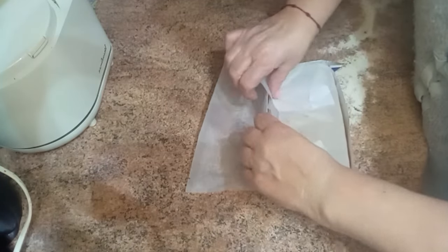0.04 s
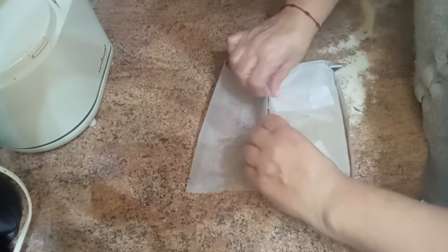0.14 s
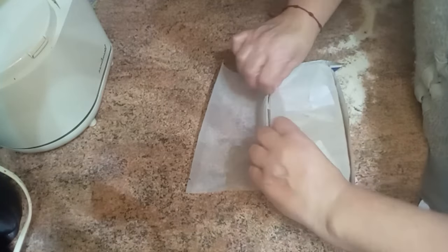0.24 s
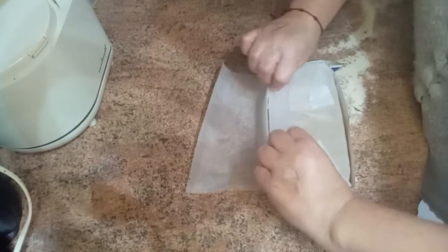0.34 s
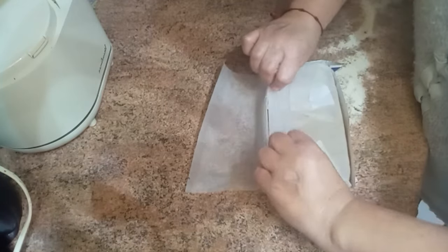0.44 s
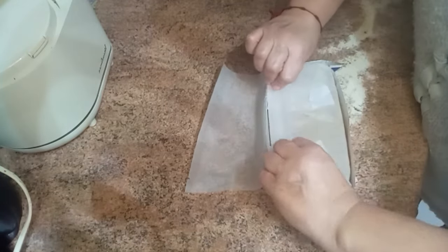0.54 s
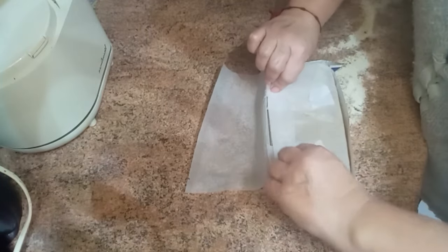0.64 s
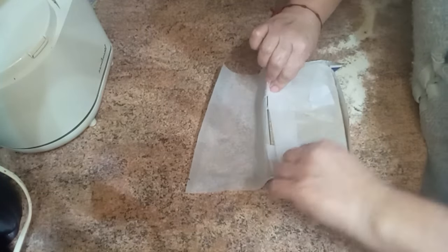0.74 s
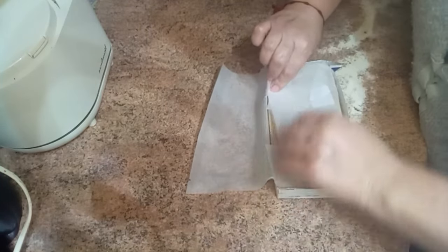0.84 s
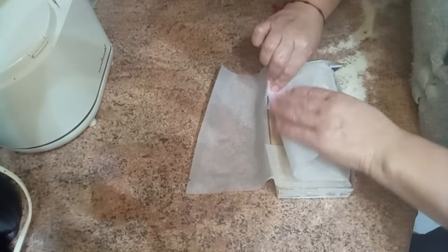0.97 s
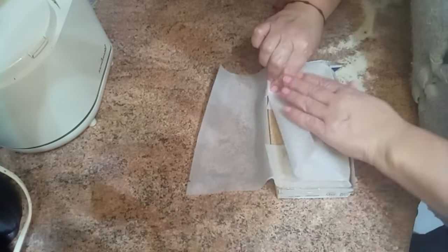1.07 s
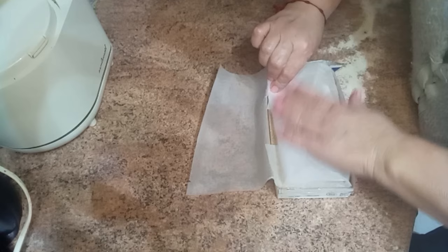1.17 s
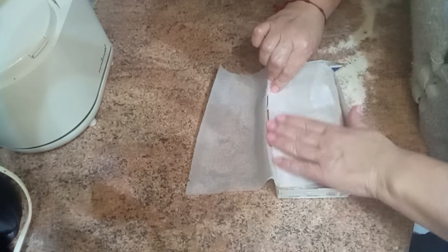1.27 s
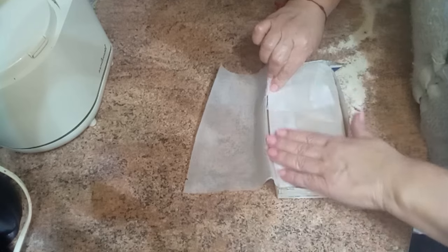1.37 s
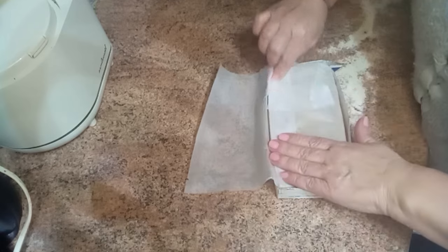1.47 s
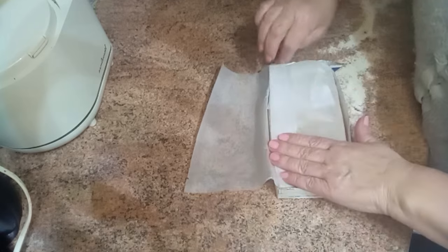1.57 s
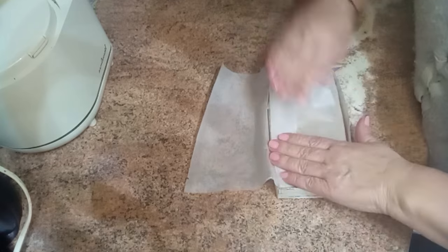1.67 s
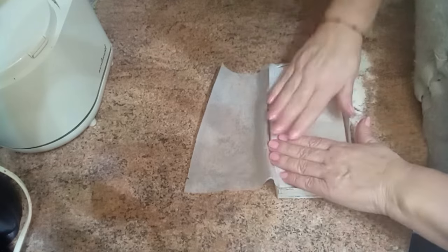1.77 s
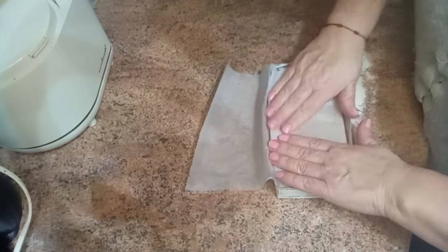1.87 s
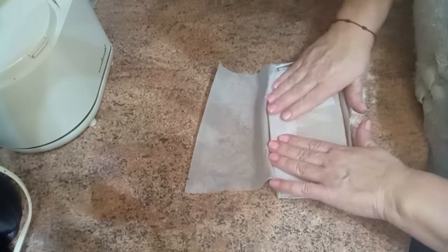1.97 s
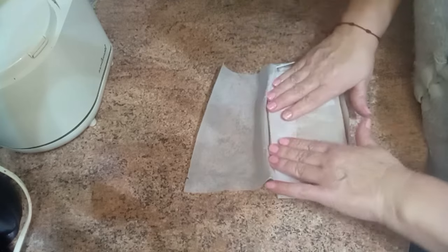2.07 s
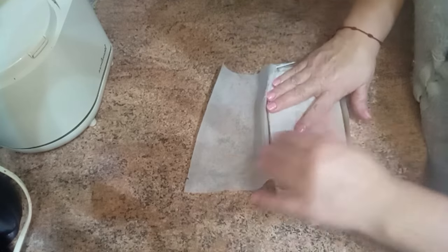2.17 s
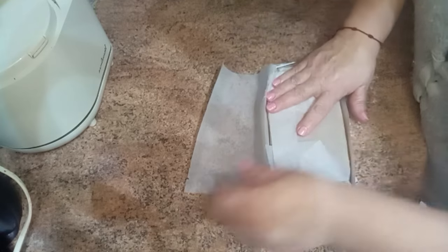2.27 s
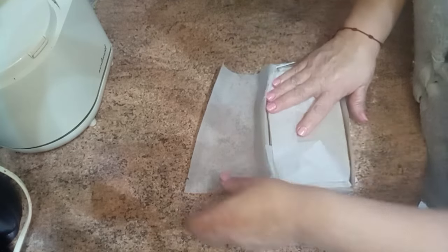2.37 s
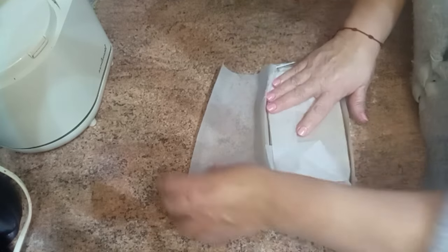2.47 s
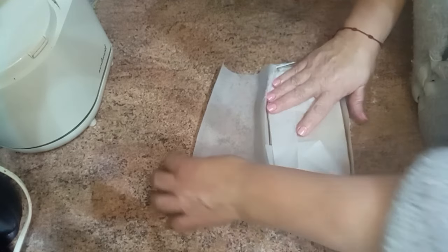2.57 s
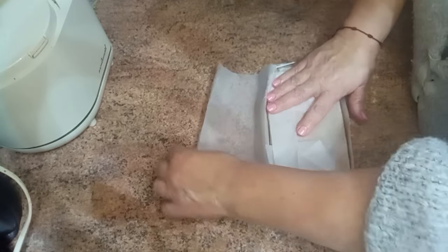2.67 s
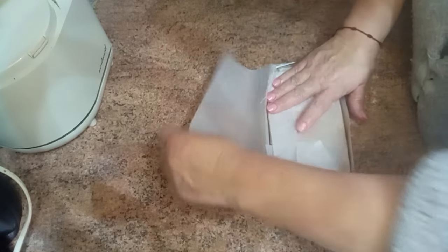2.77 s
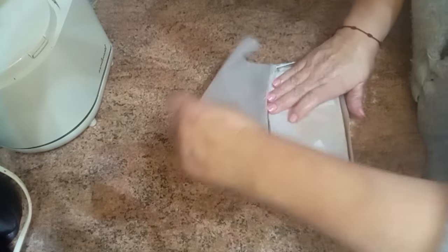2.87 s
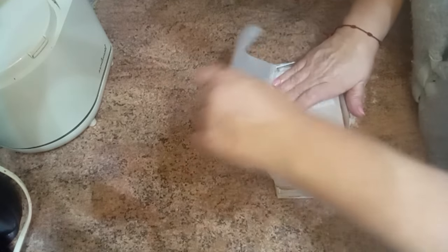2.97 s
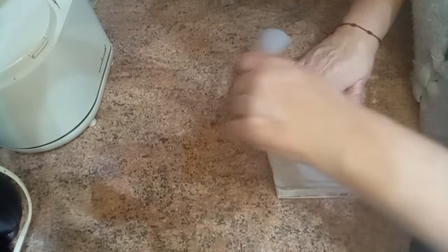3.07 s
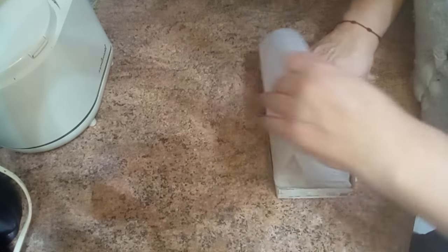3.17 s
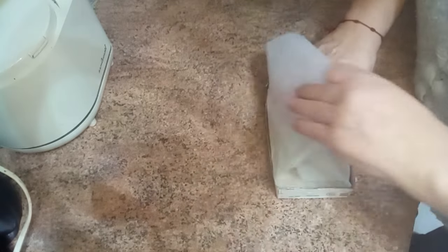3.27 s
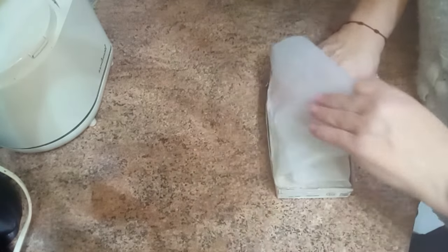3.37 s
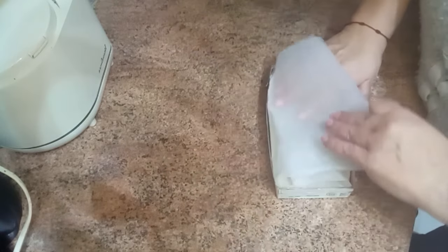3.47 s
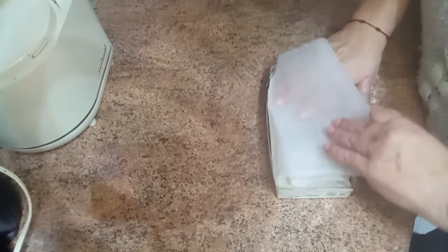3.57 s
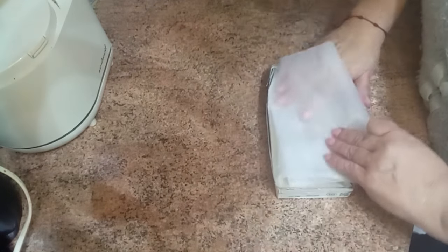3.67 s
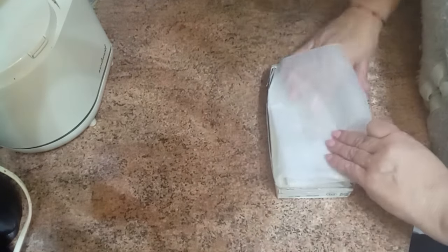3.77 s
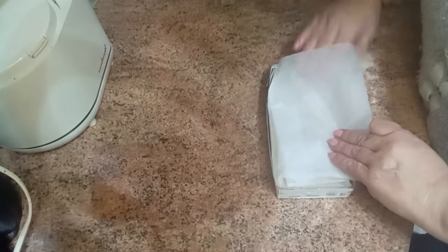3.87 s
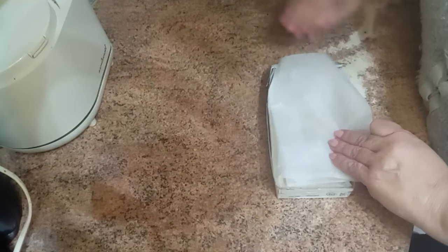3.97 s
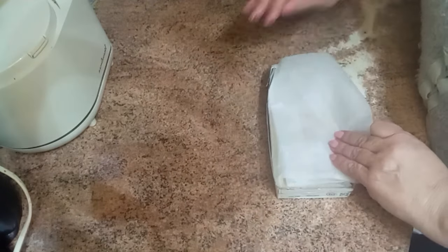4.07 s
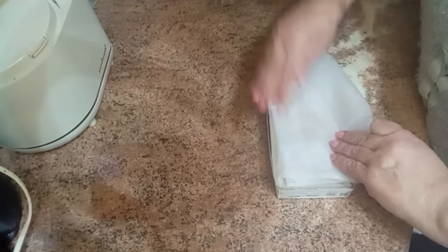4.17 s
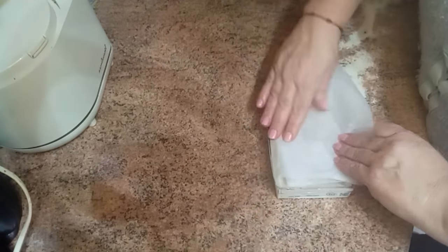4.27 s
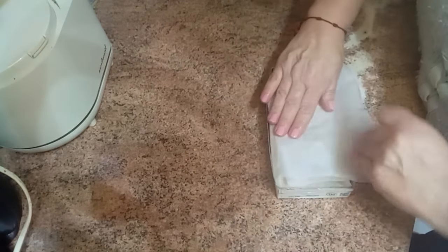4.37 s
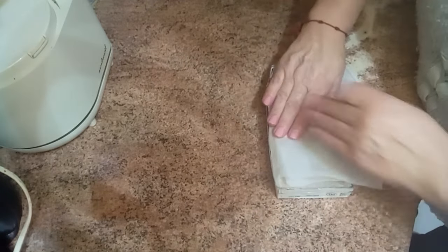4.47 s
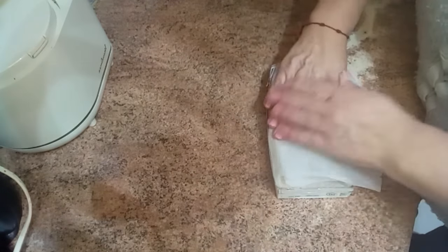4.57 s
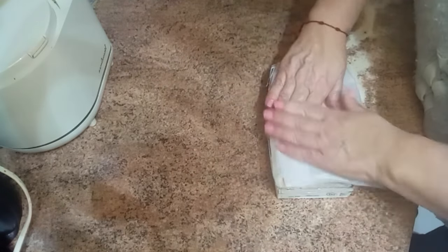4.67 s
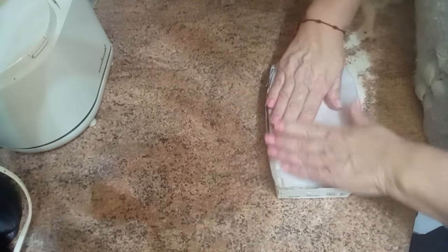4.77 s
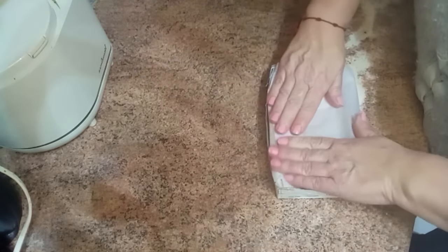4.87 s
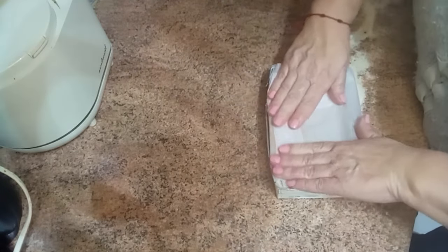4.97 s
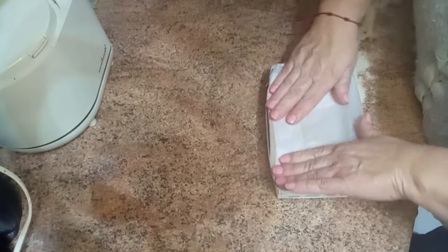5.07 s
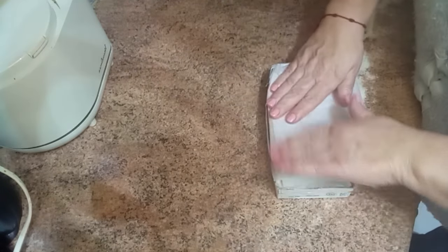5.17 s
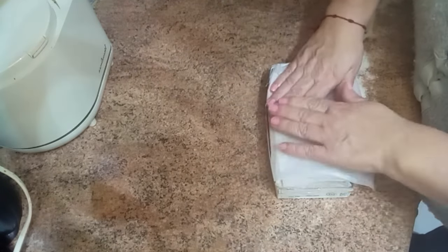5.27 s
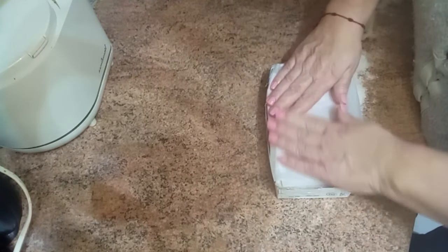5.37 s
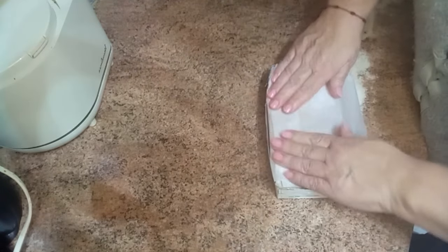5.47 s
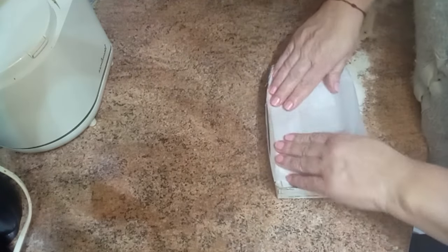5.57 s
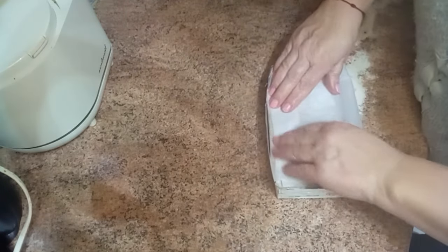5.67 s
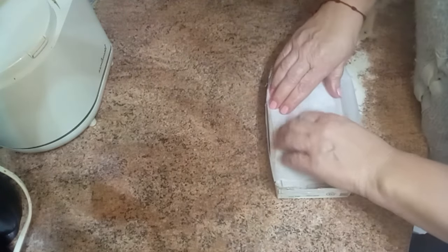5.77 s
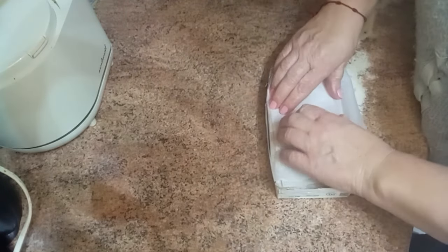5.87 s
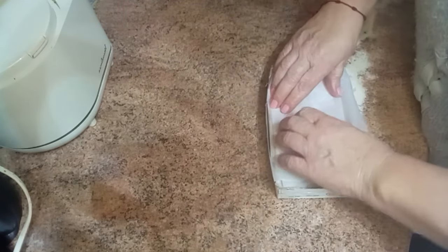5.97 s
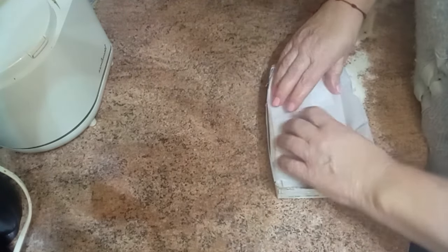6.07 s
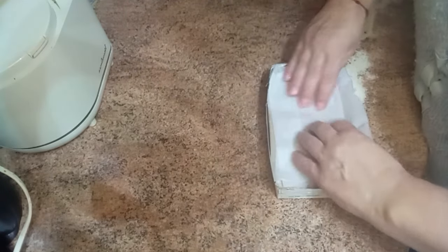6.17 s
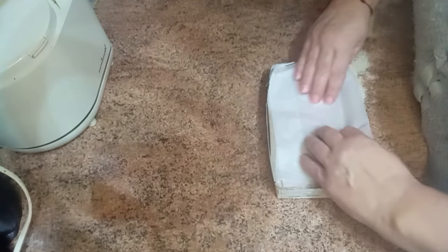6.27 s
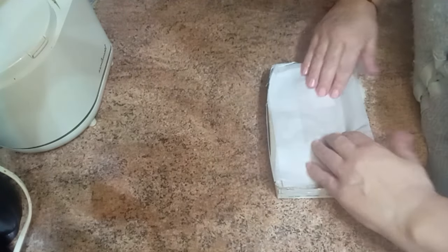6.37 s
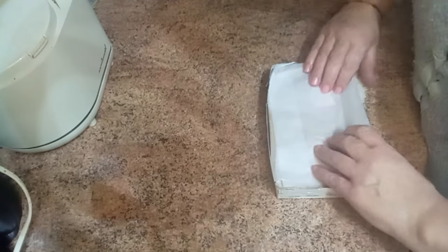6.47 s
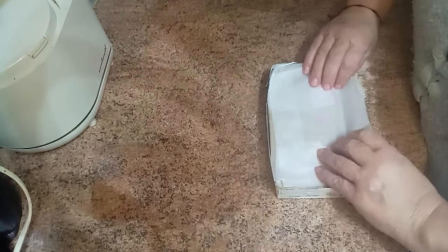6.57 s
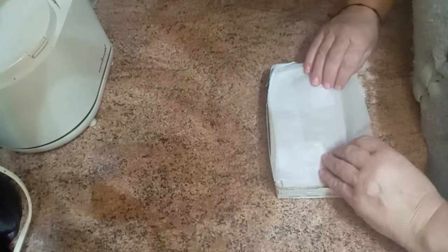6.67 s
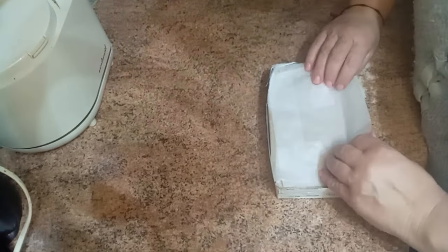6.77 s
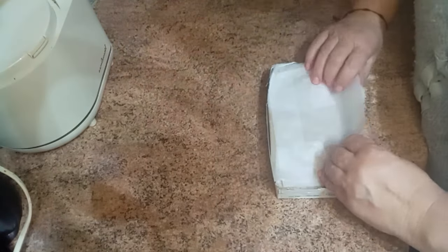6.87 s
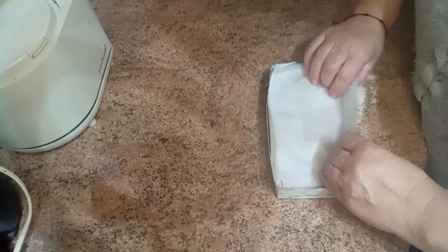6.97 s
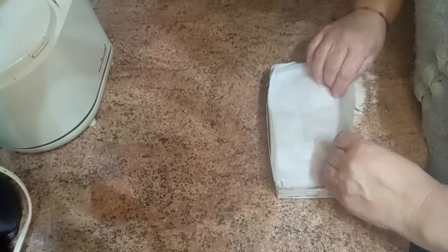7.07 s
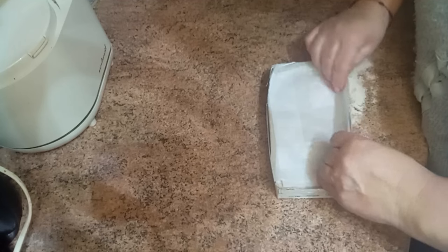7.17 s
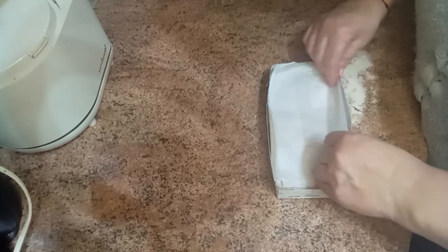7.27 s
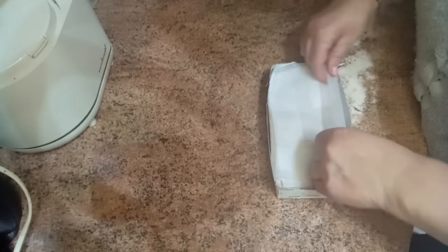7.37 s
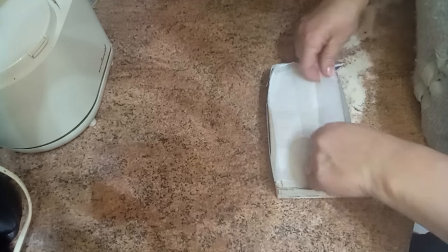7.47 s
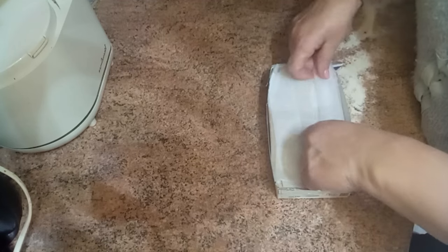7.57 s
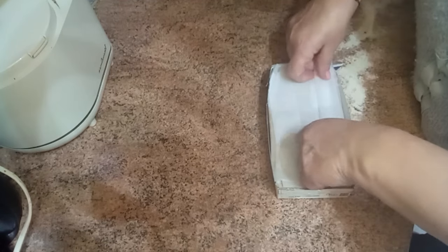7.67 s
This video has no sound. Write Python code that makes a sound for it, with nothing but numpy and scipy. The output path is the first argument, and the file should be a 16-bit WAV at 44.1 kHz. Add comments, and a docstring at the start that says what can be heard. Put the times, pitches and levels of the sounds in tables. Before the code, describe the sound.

Close, dry crinkling of a paper sheet being folded and pressed by hand, crisp snaps over fine rustle, faint bumps and low room murmur.

```python
"""A small kitchen: at the counter, two hands fold baking paper over a block and smooth it, with short pauses.
Creases snap as quick chains of clicks that make patches of paper ring. Below them is a rustle of countless
tiny buckles, driven by the hand strokes. A loose flap wobbles with a low rumble, and now and then a hand
bumps the block or the counter: a short sinking tone with a puff of air. Short reflections and a fading
tail surround all this, over the steady murmur of the room."""
import sys
import numpy as np
from scipy import signal
from scipy.fft import rfft, irfft
from scipy.io import wavfile
from scipy.ndimage import uniform_filter1d

SR = 44100
rng = np.random.default_rng(int(sys.argv[2]) if len(sys.argv) > 2 else 0)


def generate_wav(signal):
    """Clip the signal to [-1, 1] and save it as 16-bit WAV at the path in sys.argv[1]."""
    frames = np.transpose(np.atleast_2d(signal))
    scaled = np.clip(frames, -1, 1) * 32767
    pcm = np.round(scaled).astype(np.int16)
    wavfile.write(sys.argv[1], SR, pcm)


N = 340893


def amp(db):
    """Turn decibels into a plain multiplier."""
    return 10 ** (np.asarray(db) / 20)


def evened(x):
    """Scale a sound to an average (RMS) size of one."""
    return x / np.sqrt(np.mean(x ** 2) + 1e-20)


def read(points, hz):
    """Read a curve whose points are joined by straight lines on a log-frequency axis."""
    f, value = np.transpose(points)
    return np.interp(np.log(hz + 1), np.log(f + 1), value)


def add(mix, s, sound):
    """Mix in a sound that starts at s seconds, cut off at the end of the mix."""
    part = mix[max(round(s * SR), 0):][:len(sound)]
    part += sound[:len(part)]


def wander(rate_hz):
    """A smooth random curve of unit size that changes about rate_hz times a second."""
    knots = rng.standard_normal(N // 10)
    position = np.arange(N) / SR * 2 * rate_hz
    return evened(np.interp(position, np.arange(len(knots)), knots))


def below(x, hz, order=3):
    """Low-pass without delay, so that x minus the result is the matching high-pass."""
    sections = signal.butter(order, min(hz, SR / 2 - 1), fs=SR, output="sos")
    return signal.sosfiltfilt(sections, x)


def above(x, hz, order=2):
    """High-pass that never sounds ahead of its input: it removes the sound under hz."""
    sections = signal.butter(order, min(hz, SR / 3), "high", fs=SR, output="sos")
    return signal.sosfilt(sections, x)


def hush():
    """The steady murmur of the quiet room: noise shaped to a fixed spectrum."""
    level_db = -70.5
    # spectrum of the murmur, before it is set to level_db: (f/Hz, level/dB per Hz)
    room_curve = [(20, -2), (40, -27), (58, 7.5), (75, -3.5), (142, 5.5), (200, -6.5), (300, -6),
                  (700, -14), (1300, -10), (5700, -42), (8000, -71), (13000, -42), (15500, -34)]
    shape = amp(read(room_curve, np.fft.rfftfreq(N, 1 / SR)))
    murmur = irfft(rfft(rng.standard_normal(N)) * shape, N)
    return amp(level_db) * evened(murmur)


def gesture(start, swell, hold, db, settle_db_per_s):
    """Power of one movement: it swells, holds, and dies away."""
    t = np.arange(N) / SR - start
    rise = np.clip(t / max(swell, 1e-3), 0, 1)
    fall_s = np.clip(t - swell - hold, 0, 1)
    return (rise * amp(db - settle_db_per_s * fall_s)) ** 2


def effort():
    """How strongly all strokes together drive the body, the crisp middle and the fizz of the sheet."""
    # once the hand lets go the sheet settles, and the fine fizz dies faster
    settle_db_per_s, fizz_settle_db_per_s = 163, 182
    # a hand pushes, bends or smooths the sheet; levels are before the gains in rustle():
    # (start t/s, swell t/s, hold t/s, crisp rustle level/dB,
    #  body of the whole sheet level/dB against crisp, fine fizz level/dB against crisp)
    hand_strokes = [(0, 0.0017, 0.11, -45, -12.5, -12), (0.094, 0.14, 0.094, -37, -7, -12.5),
                    (0.346, 0.0099, 0.11, -41.5, -24, -10), (0.471, 0.059, 0.21, -37.5, -19.5, -10),
                    (0.75, 0.032, 0.011, -35.5, -11.5, -8.5), (0.856, 0.038, 0.01, -46.5, -26, -1),
                    (0.916, 0.0027, 0.09, -54.5, -9.5, -27), (1.098, 0.059, 0.034, -46.5, -28, -7.0),
                    (1.167, 0.014, 0.019, -34, -16.5, -4.5), (1.267, 0.027, 0.14, -37, -23.5, -8.5),
                    (1.445, 0.023, 0.037, -35.5, -22, -8.5), (1.78, 0.018, 0.19, -36, -19, -8.5),
                    (2.084, 0.038, 0.025, -39.5, -19.5, -10.5), (2.303, 0.0041, 0.015, -62, -12, -21),
                    (2.463, 0.0044, 0.014, -51.5, -21, -8), (2.601, 0.01, 0.17, -56, -15, -17.0),
                    (2.706, 0.073, 0.17, -44.0, -10.5, -15), (2.865, 0.007, 0.1, -37, -13.5, -8),
                    (2.983, 0.034, 0.26, -35.5, -10, -10.5), (3.315, 0.052, 0.021, -35, -10.5, -17),
                    (3.391, 0.029, 0.024, -25.5, -16, -8), (3.486, 0.095, 0.044, -31.5, -14.5, -15),
                    (3.612, 0.02, 0.031, -27, -15.5, -10.0), (3.69, 0.009, 0.031, -36, -12, -12),
                    (3.778, 0.036, 0.049, -44, -12.0, -12.0), (3.948, 0.011, 0.0041, -46.5, -10.5, -15),
                    (4.08, 0.011, 0.013, -86, -24, -20), (4.185, 0.05, 0.05, -37, -15.5, -13.0),
                    (4.247, 0.005, 0.071, -28.5, -13.5, -10.5), (4.379, 0.034, 0.055, -38, -10, -13.0),
                    (4.59, 0.0066, 0.14, -33.5, -14, -9), (4.729, 0.041, 0.03, -30.5, -15.5, -8.0),
                    (4.892, 0.005, 0.24, -41.5, -17.5, -9.5), (5.135, 0.045, 0.013, -37.5, -15, -11.5),
                    (5.293, 0.012, 0.071, -32.5, -13.5, -10.5), (5.425, 0.006, 0.14, -35.0, -18, -9),
                    (5.656, 0.18, 0.099, -35, -19, -10.5), (5.658, 0.02, 0.06, -39.5, -20.5, -15),
                    (5.981, 0.087, 0.043, -33.5, -14.5, -11.5), (6.148, 0.0073, 0.093, -35, -17.5, -7.5),
                    (6.276, 0.025, 0.14, -43, -18, -14), (6.466, 0.057, 0.068, -35.0, -12.5, -8.5),
                    (6.63, 0.006, 0.17, -41, -13.5, -8), (6.83, 0.0093, 0.0086, -37, -12.5, -6),
                    (6.921, 0.02, 0.093, -35.5, -12.5, -12), (7.048, 0.034, 0.046, -33.5, -12.5, -9),
                    (7.19, 0.029, 0.094, -35.5, -22, -11.5), (7.339, 0.033, 0.024, -38, -24, -15),
                    (7.426, 0.022, 0.04, -35.5, -15.5, -11.5), (7.574, 0.034, 0.045, -38.5, -21, -14),
                    (7.706, 0.017, 0.015, -39, -15, -13)]
    body, crisp, fizz = np.zeros((3, N))
    for start, swell, hold, db, body_db, fizz_db in hand_strokes:
        push = gesture(start, swell, hold, db, settle_db_per_s)
        crisp += push
        body += push * amp(body_db) ** 2
        fizz += gesture(start, swell, hold, db + fizz_db, fizz_settle_db_per_s)
    return np.sqrt([body, crisp, fizz])


def paper(x, size=2048):
    """The sheet colours every sound it sends out, because it radiates some pitches better than others."""
    # how well the paper radiates: (f/Hz, level/dB per Hz)
    radiation = [(90, -25), (200, -18.5), (420, -16), (660, -3.3), (920, -9), (1500, -3.5), (1850, -8),
                 (2300, -1.5), (2900, -5.5), (6300, 0), (7900, -7.5), (9600, -4.5), (13400, -16),
                 (15200, -5)]
    # resonances of the sheet over the block: (f/Hz, width f/Hz, lift level/dB)
    resonances = [(313, 90, 0.5), (753, 190, 2), (1076, 200, 3.5), (1513, 120, 1), (2050, 550, 1.5),
                  (3340, 1400, 3)]
    hz = abs(np.fft.fftfreq(size, 1 / SR))
    db = read(radiation, hz)
    db = db + sum(lift_db / (1 + (2 * (hz - f) / width) ** 2) for f, width, lift_db in resonances)
    # minimum phase: the response starts at once and never sounds ahead of its cause
    spectrum = np.exp(np.conj(signal.hilbert(np.log(amp(db)))))
    ring = np.fft.ifft(spectrum).real[:size // 2]
    return signal.oaconvolve(x, ring / np.linalg.norm(ring))


def facet(x, hz, q):
    """A small stiff patch of paper rings briefly at its own pitch; a higher q rings longer."""
    hz = min(hz, 15000)
    return signal.lfilter(*signal.iirpeak(hz, max(q, hz / 15000), fs=SR), x)


def crinkle(grains_per_s=3600, spread_db=2.0, clumps_per_s=110, clump_s=0.0056, calm=0.8,
            patchy_db=3.0, patch_hz=35, q=2.8, rub=0.24, grain_s=0.001, count=24, size=1300):
    """Clumps of tiny buckles on facets of all sizes, over the plain hiss of skin rubbing on paper."""
    grains, t = np.zeros(N), np.arange(size) / SR
    for hz in np.geomspace(400, 14500, count):
        force = amp(spread_db * np.minimum(rng.exponential(1, N), 3.2)) * rng.choice([-1, 1], N)
        clicks = force * (rng.random(N) < grains_per_s / count / SR)
        # each tiny buckle is itself a brief rasp of fibres
        rasp = signal.oaconvolve(clicks, np.exp(-t / grain_s))[:N] * rng.standard_normal(N)
        grains += (facet(rasp, hz, q) + 0.21 * rasp) * amp(patchy_db * wander(patch_hz))
    # one slip sets off many buckles at once, and the clump dies away
    starts = rng.random(N) * (rng.random(N) < clumps_per_s / SR)
    slips = signal.oaconvolve(starts, np.exp(-t / clump_s))[:N]
    rubbed = evened(grains) + rub * rng.standard_normal(N)
    sound = paper(rubbed * (calm + 2 * np.tanh(slips)))[:N]
    # even out the slow level, so that the strokes alone set the loudness
    return sound / np.sqrt(uniform_filter1d(sound ** 2, size=1700) + 1e-12)


def rustle(body, crisp, fizz, body_hz=1300, fizz_hz=7800, dull_hz=12000, top_db=-2.5,
           body_db=-1.0, crisp_db=-2.0, fizz_db=-0.5):
    """The crinkle follows the hands: wide bends add low body, tight creasing adds high fizz."""
    sound = crinkle()
    low, most = below(sound, body_hz), below(sound, fizz_hz, order=5)
    high = sound - most
    # the very top of the fizz is softened by top_db
    fine = amp(top_db) * high + (1 - amp(top_db)) * below(high, dull_hz)
    body_sound = amp(body_db) * body * evened(low)
    crisp_sound = amp(crisp_db) * crisp * evened(most - low)
    return body_sound + crisp_sound + amp(fizz_db) * fizz * evened(fine)


def random_creases(drive, per_s=24, typical_db=-36, typical_push_db=-37, follow=0.92, spread_db=2.2,
                   loudest_db=-31, hz=3700, octaves=0.62, run_s=0.0024, run_spread=.35, count=300):
    """Further creases give way at random, harder when the hand pushes harder; makes rows for snaps()."""
    chance = rng.random((count, 2))
    normal = np.clip(rng.standard_normal((count, 3)), -2, 2)
    when = (np.arange(count) + chance[:, 0]) / count * (N - 1) / SR
    push_db = 20 * np.log10(drive[(when * SR).astype(int)] + 1e-9)
    db = typical_db + follow * (push_db - typical_push_db) + spread_db * normal[:, 0]
    pitch = hz * 2 ** (octaves * normal[:, 1])
    length = run_s * np.exp(run_spread * normal[:, 2])
    rows = np.transpose([when, np.minimum(db, loudest_db), pitch, length])
    return rows[chance[:, 1] < per_s * N / SR / count]  # keep per_s of them on average


def snaps(creases, clicks_per_s=3000, spread_db=4, run=1.0, q=2.3, broad=0.31, slow_s=0.013,
          harder=0.66, scrape=0.13, ring=0.57, ring_q=12, cut=0.37, gain_db=-1.3, size=1400, count=220):
    """Each buckle runs along its crease as a quick, dying chain of clicks that rings the facets beside it."""
    out, t = np.zeros(N), np.arange(size) / SR
    for s, db, hz, length in creases:
        chance, height, fibres = rng.random(size), rng.standard_normal(size), rng.standard_normal(size)
        strength = np.sign(fibres) * amp(spread_db * np.clip(height, -2, 1))
        chain = strength * (chance < clicks_per_s / SR)
        chain[0] = 1.3  # the crease gives way
        fade = np.exp(-(t / max(run * length, 1e-4)) ** 1.15 / 2)
        chain = (chain + scrape * fibres) * fade
        ratios = np.exp(rng.uniform(-0.19, 0.15, 2))
        sides = sum(facet(chain, hz * ratio, ring_q) for ratio in ratios)
        # the quicker and harder the buckle, the wider its spectrum
        crack = broad * amp(harder * (db + 32.5)) / (1 + length / slow_s) * chain
        # a patch of paper radiates little below its own ring
        snap = paper(above(crack + facet(chain, hz, q) + ring * sides, cut * hz, order=1))
        # level counted over 5 ms (count samples)
        add(out, s, amp(db + gain_db) * snap * np.sqrt(count / np.sum(snap ** 2)))
    return out


def flap(low_ratio=0.48, high_ratio=1.94, flutter_db=2.0, flutter_hz=25, settle_db_per_s=150):
    """The free part of the sheet wobbles with a low, uneven rumble: noise kept near one pitch."""
    # the loose flap swings; levels are before the flutter:
    # (start t/s, swell t/s, hold t/s, level/dB, wobble f/Hz)
    flap_swings = [(0.13, 0.1, 0.045, -53.5, 384), (3.103, 0.015, 0.042, -51, 292),
                   (3.233, 0.016, 0.018, -47, 267), (3.405, 0.016, 0.053, -53.5, 380),
                   (3.593, 0.044, 0.042, -53, 380)]
    out = np.zeros(N)
    for start, swell, hold, db, hz in flap_swings:
        rumble = above(below(rng.standard_normal(N), high_ratio * hz), low_ratio * hz, order=3)
        out += np.sqrt(gesture(start, swell, hold, db, settle_db_per_s)) * evened(rumble)
    return out * amp(flutter_db * wander(flutter_hz))


def bumps(t60=0.12, linger=1.4, sag=0.06, sag_s=0.038, puff=0.71, puff_hz=480, puff_t60=.15,
          firm_s=0.0057, low_hz=100, gain_db=0.0, size=11000):
    """A push rings the block dully; a quick one also squeezes a puff of air from under the paper."""
    # a hand meets the block or the counter; the pitch is the middle of its slide:
    # (t/s, level/dB, thud f/Hz, build-up of the push t/s)
    hand_bumps = [(2.597, -34.5, 127, 0.0037), (2.653, -45, 176, 0.0026), (2.921, -40.5, 167, 0.0039),
                  (3.115, -45, 149, 0.0044), (3.372, -43, 123, 0.012), (3.699, -47, 141, 0.0051),
                  (4.284, -42, 126, 0.0079), (6.451, -37, 141, 0.021), (6.506, -51, 135, 0.0064),
                  (6.587, -52, 105, 0.0086), (6.847, -46, 147, 0.014), (7.107, -46, 130, 0.0092)]
    out, t = np.zeros(N), np.arange(size) / SR
    for s, db, hz, rise in hand_bumps:
        breath = above(below(rng.standard_normal(size), puff_hz, order=2), low_hz)
        air = evened(breath) * amp(-60 * t / puff_t60)
        pitch = hz * (1 + sag * (2 * np.exp(-t / sag_s) - 1))  # the contact softens as the hand settles
        tone = np.sin(2 * np.pi * np.cumsum(pitch) / SR)
        thud = tone * amp(-60 * t / (t60 + linger * rise))  # a slow push lasts longer
        bump = (thud + puff * air / (1 + rise / firm_s)) * (1 - np.exp(-t / rise))
        add(out, s, amp(db + gain_db) * bump)
    return out


def echoes(near_db=-8, near_t60=0.022, near_hz=8000, tail_db=-11.5, size=16000, count=10):
    """Quick, slightly dulled reflections off the counter and the hands, then a tail whose top dies fast."""
    # how long the kitchen takes to fade by 60 dB: (f/Hz, fade t/s)
    fade_times = [(150, 0.16), (800, 0.32), (2500, 0.48), (6000, 0.36), (10000, 0.28), (15000, 0.21)]
    t = np.arange(size) / SR
    taps = rng.choice([-1., 1.], size) * (rng.random(size) < 2 / count)
    near = taps * (t > .0008) * amp(-60 * t / near_t60)
    near = below(near / np.linalg.norm(near), near_hz, order=1)
    # split the tail into pitch bands so that each can fade at its own speed
    hz, when, z = signal.stft(taps * (t > .006), SR, nperseg=256)
    fade = amp(-60 * when / read(fade_times, hz)[:, None])
    tail = signal.istft(z * fade, SR, nperseg=256)[1][:size]
    return amp(near_db) * near + amp(tail_db) * tail / np.linalg.norm(tail)


def kitchen(x, size=3000):
    """The sound comes from ever new places on the sheet, so its echoes keep changing."""
    out = x.copy()
    window = signal.windows.cosine(2 * size)  # overlapping pieces fade into each other
    for start in range(0, N, size):
        part = x[start:start + 2 * size]
        add(out, start / SR, signal.fftconvolve(part * window[:len(part)], echoes()))
    return out


def scene():
    """Paper and hands with their echoes, over the murmur of the kitchen."""
    # a crease buckles, from a sharp loud snap to a faint tick in a pause;
    # levels are before gain_db in snaps():
    # (t/s, level/dB, ring of the paper facet f/Hz, run of the buckle t/s)
    placed_creases = [(0.0671, -36, 3880, 0.0018), (0.1274, -32, 4300, 0.002), (0.2561, -31, 1530, .0037),
                      (0.3198, -23, 4740, 0.0045), (0.4863, -24.5, 4800, 0.0015),
                      (0.5806, -22.5, 5200, 0.0016), (0.6318, -27, 9300, 0.00099),
                      (0.7072, -26, 3830, .0058), (0.7761, -24.5, 4020, 0.0058), (0.834, -30, 4750, 0.0052),
                      (0.8873, -32, 2080, .0026), (0.9283, -38.5, 3300, 0.0024),
                      (1.0311, -45.5, 2870, 0.0026), (1.051, -44.5, 3380, 0.0027),
                      (1.1715, -31.5, 4100, 0.0017), (1.2185, -30, 5400, 0.0043),
                      (1.2941, -27.5, 6040, 0.0022), (1.3381, -36, 8200, .0014),
                      (1.3568, -32, 6900, 0.0025), (1.3915, -24, 7900, .0043), (1.5483, -27, 4150, 0.00079),
                      (1.5898, -29.5, 2540, 0.00049), (1.686, -57, 1400, .003), (1.7164, -54, 4630, .0011),
                      (1.7882, -31, 6900, .002), (1.8022, -25.5, 2380, 0.015), (1.933, -25.5, 2520, .0021),
                      (1.9885, -26, 6000, 0.0013), (2.0007, -29, 2930, .0017), (2.1496, -26, 5340, 0.0015),
                      (2.3142, -50, 11600, 0.00037), (2.3394, -55.5, 5200, 0.0009),
                      (2.4337, -51, 7500, 0.00076), (2.4572, -29, 6200, 0.0018), (2.5993, -44, 3400, .0039),
                      (2.6564, -39, 2880, .0061), (2.7024, -44, 3500, .0036), (2.739, -37.5, 3100, 0.0016),
                      (2.7915, -33, 2200, 0.002), (2.8652, -30, 1920, 0.0064), (2.8772, -28.5, 5750, .0018),
                      (2.9257, -30, 1680, .0036), (3.0365, -30.5, 2100, .0041), (3.0624, -25, 2010, 0.0051),
                      (3.1227, -23, 6600, 0.003), (3.1683, -21.5, 2250, 0.0025),
                      (3.2811, -30, 3250, 0.0044), (3.3512, -32.5, 1610, 0.0027),
                      (3.3741, -27, 4800, .0039), (3.4473, -24, 5960, 0.0035),
                      (3.5734, -30.5, 2440, 0.0041), (3.6168, -23.5, 2400, .0027),
                      (3.6472, -19, 3000, 0.0057), (3.7102, -21, 5040, 0.0011),
                      (3.8059, -30.5, 2430, 0.00088), (3.8524, -32, 1910, 0.0022),
                      (3.9308, -41.5, 2280, 0.0026), (3.9725, -31.5, 5350, 0.0021),
                      (4.0778, -39, 2670, 0.0028), (4.1946, -38, 4500, .0021), (4.2143, -42.5, 1490, .002),
                      (4.2511, -22.5, 2530, 0.0025), (4.2588, -22, 5150, 0.007),
                      (4.3356, -26, 5440, 0.0011), (4.4215, -43, 2700, 0.0018),
                      (4.4712, -32.5, 3360, 0.0056), (4.6005, -29.5, 2180, 0.0025),
                      (4.6111, -26, 3400, 0.0037), (4.6904, -25.5, 4100, 0.001),
                      (4.759, -17.5, 3360, .0025), (4.7712, -24, 4800, .0046), (4.9145, -30, 5640, 0.0012),
                      (5.0885, -34, 4300, 0.0022), (5.1803, -29.5, 2500, 0.0023),
                      (5.2975, -34, 2620, 0.0045), (5.312, -30, 3130, 0.0037), (5.3501, -24, 4050, 0.0029),
                      (5.4502, -28.5, 1900, 0.0077), (5.4945, -28, 5100, 0.0023),
                      (5.5272, -31, 2650, .0011), (5.5905, -32, 6550, 0.0024), (5.8416, -25, 3380, 0.0008),
                      (5.867, -23, 7600, 0.00063), (5.9725, -38, 6850, 0.00069),
                      (6.0265, -27.5, 4700, .0014), (6.1167, -25.5, 5230, 0.0017),
                      (6.3196, -32.5, 2600, 0.0016), (6.4881, -23.5, 6430, 0.0015),
                      (6.5838, -25.5, 4740, 0.0019), (6.6436, -29, 5700, .0035),
                      (6.6957, -32, 1300, 0.0024), (6.7612, -32.5, 4000, 0.0019),
                      (6.8423, -29.5, 3450, 0.0018), (6.8593, -32, 2800, 0.0027),
                      (6.9431, -31, 2800, 0.0035), (6.99, -31, 2090, 0.0069), (7.0281, -33.5, 4000, .001),
                      (7.0974, -27.5, 4460, 0.0036), (7.2411, -26.5, 4370, 0.0026),
                      (7.2784, -23.5, 2350, .0014), (7.3953, -28, 4800, 0.0021),
                      (7.4687, -25.5, 5700, 0.001), (7.4882, -22.5, 5700, 0.0038),
                      (7.6086, -30, 1820, 0.0015), (7.6348, -27.5, 2070, .0029)]
    body, crisp, fizz = effort()
    creases = snaps(placed_creases) + snaps(random_creases(crisp))
    handling = creases + rustle(body, crisp, fizz) + bumps() + flap()
    return (kitchen(handling) + hush())[None]


def record(dry):
    """The recorder's band limit: a steep low-pass takes away the highest treble."""
    edge_hz = 16050
    low_pass = signal.firwin(401, edge_hz, window=("kaiser", 9), fs=SR)
    return signal.oaconvolve(dry, low_pass[None], "same")


dry = scene()
out = record(dry)
generate_wav(out)
```